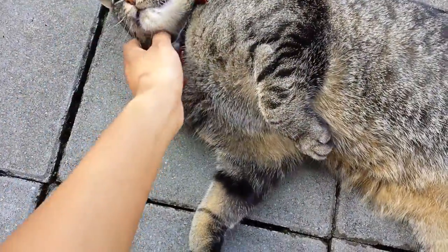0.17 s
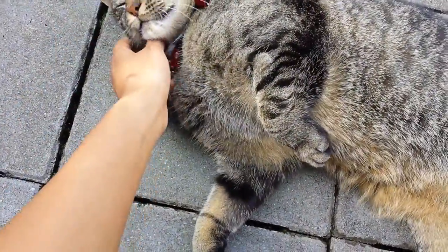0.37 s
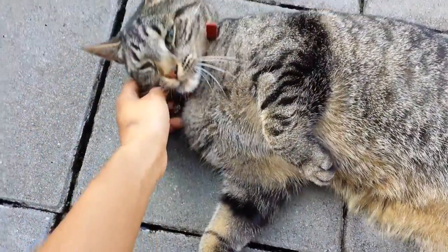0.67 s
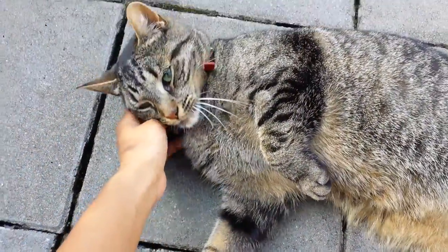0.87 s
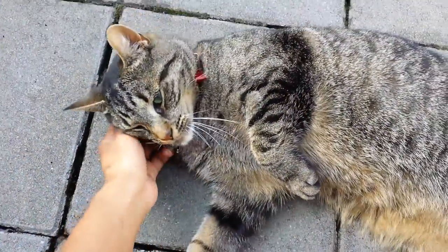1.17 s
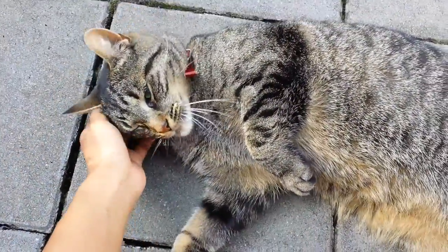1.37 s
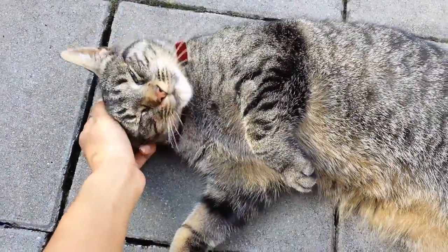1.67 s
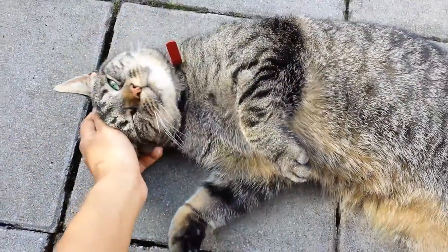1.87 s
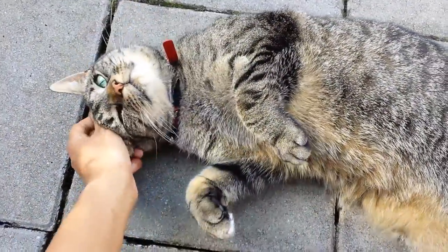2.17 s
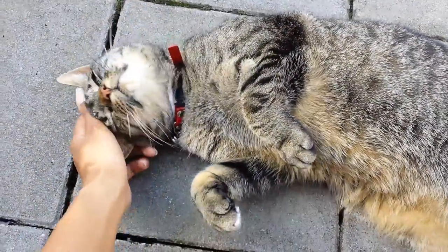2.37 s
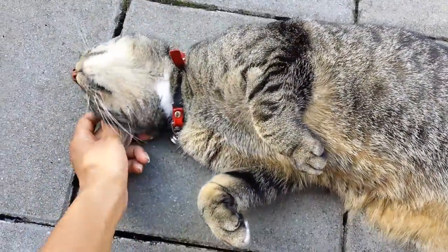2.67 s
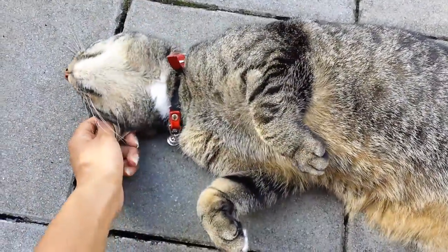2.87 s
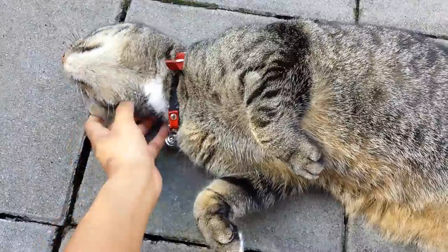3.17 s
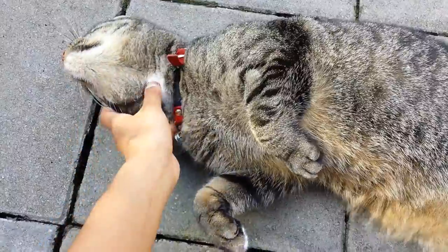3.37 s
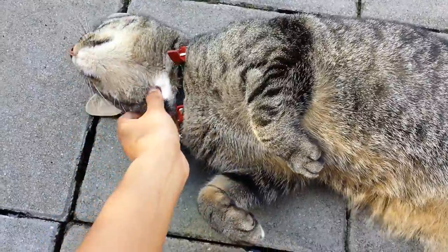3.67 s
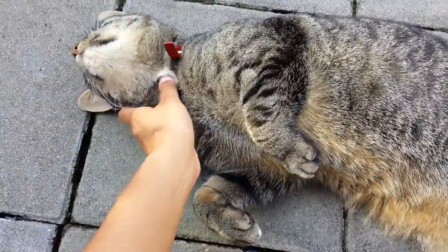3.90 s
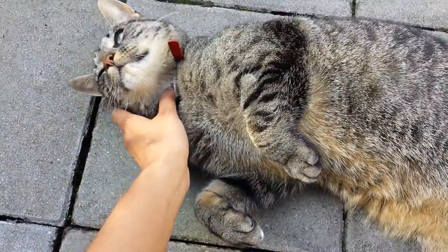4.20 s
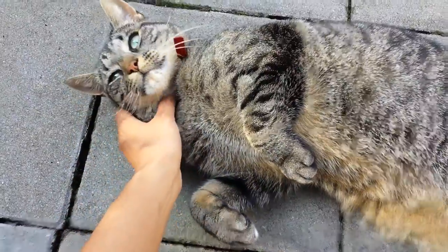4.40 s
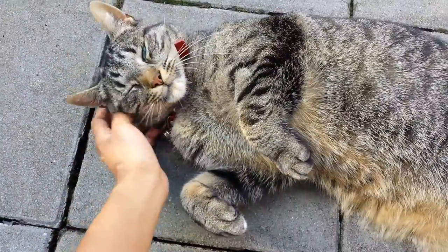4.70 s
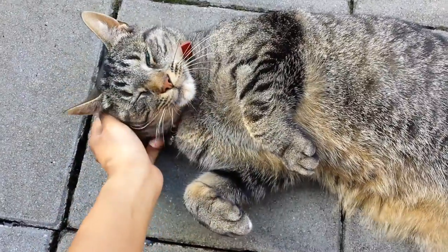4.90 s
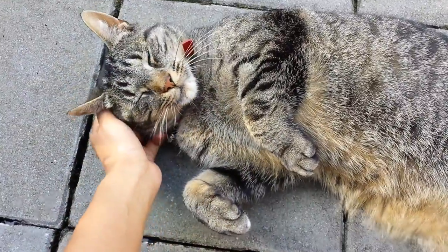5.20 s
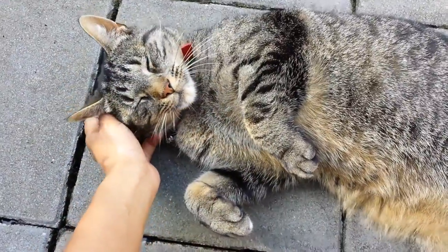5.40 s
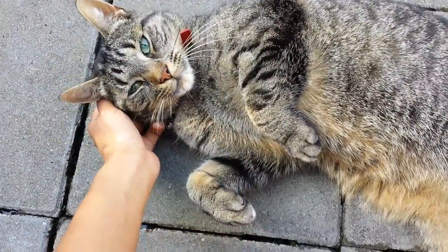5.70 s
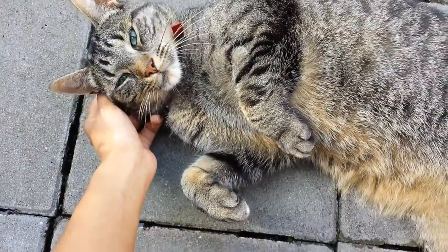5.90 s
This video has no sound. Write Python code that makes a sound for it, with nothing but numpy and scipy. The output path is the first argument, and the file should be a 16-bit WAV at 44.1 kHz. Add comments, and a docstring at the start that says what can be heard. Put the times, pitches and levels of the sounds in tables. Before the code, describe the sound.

Close to the microphone, a hand scratches a cat in a paved yard, making a faint hiss in the fur. The small metal bell on its collar gives thin, half-muffled clinks and tiny rattles, with one much louder jingle a little after a second in. It goes nearly quiet, then returns with scattered soft clinks. A distant engine hums over low outdoor rumble throughout, swelling toward the end.

```python
"""A distant engine hums over low outdoor rumble while, close by, a hand scratches a cat's chin on a paved
yard. The fingers hiss softly in the coat and now and then tap collar or paving.
The small metal bell on the collar clinks, half muffled by fur: its pellet rolls round the shell or
strikes it, and the whole bell knocks against its loop. Each contact rings three families of shell modes."""
import sys
import numpy as np
from scipy import signal
from scipy.fft import rfft, irfft, next_fast_len
from scipy.io import wavfile
from scipy.ndimage import uniform_filter1d, map_coordinates

SR = 44100
rng = np.random.default_rng(int(sys.argv[2]) if len(sys.argv) > 2 else 0)


def generate_wav(sig):
    """Save sig (samples, or channels by samples) to the path in sys.argv[1] as 16-bit PCM at SR."""
    pcm = np.round(np.clip(np.atleast_2d(sig).T, -1, 1) * 32767).astype(np.int16)
    wavfile.write(sys.argv[1], SR, pcm)


N = 266805

# shell modes: (frequency [Hz], level [dB], t60 [s], left over right [dB], gain at full turn [dB])
LOW_MODES = [(1480, -21, 0.027, -9, 2), (2135, -15.5, 0.033, -15, -6), (2862, -9, 0.011, -15, -16),
             (3680, -13.5, 0.046, -20.5, 15), (3895, 2, 0.036, -22, -8), (4432, -8, 0.031, -17, 4),
             (3670, -0.5, 0.007, -15.5, -17.5)]
MIDDLE_MODES = [(6010, 2, 0.0086, -19, -3), (6230, -2.5, 0.014, -15, 7), (6630, -3, .007, -8.5, -6),
                (6780, 0, 0.004, -9.5, -18)]
TOP_MODES = [(9180, 0, .0125, 4, 0), (9750, -17, .008, 3, 0), (8800, -6, .0055, 3, 0),
             (8000, -7, .005, 4, 0), (11400, -22, .009, 5, 6)]
# the bell turns over as the cat rolls its head: (time [s], share of full turn [0-1])
BELL_TURN = [(1.5, 0.01), (3.2, 0.57)]


def amp(db):
    """Decibels to gain."""
    return 10 ** (np.asarray(db) / 20)


def unit(x):
    """x at rms 1."""
    return x / np.sqrt(np.mean(x ** 2) + 1e-20)


def decay(t, t60_s):
    """Exponential fade, 60 dB down at t60_s."""
    return np.exp(-np.log(1000) * t / t60_s)


def along(points, hz):
    """(Hz, value) points read on a log axis."""
    point_hz, values = np.transpose(points)
    return np.interp(np.log(hz + 1), np.log(point_hz + 1), values)


def curves(rows):
    """One value per sample for each column after the time."""
    times_s, *columns = np.transpose(rows)
    return [np.interp(np.arange(N) / SR, times_s, column) for column in columns]


def wobble(rate_hz):
    """Smooth random curve, rate_hz knots a second."""
    knots = rng.standard_normal(int(N * rate_hz / SR) + 4)
    return map_coordinates(knots, [np.arange(N) * rate_hz / SR])


def filtered(x, response):
    """x through a gain given as a function of Hz."""
    size = next_fast_len(N + SR // 2)
    return irfft(rfft(x, size) * response(np.fft.rfftfreq(size, 1 / SR)), size)[..., :N]


def minimum_phase(points, size=1024):
    """Causal impulse response with the given (Hz, dB) colour."""
    cepstrum = irfft(np.log(amp(along(points, np.fft.rfftfreq(size, 1 / SR)))))
    cepstrum[1:size // 2] *= 2
    cepstrum[size // 2 + 1:] = 0
    return irfft(np.exp(rfft(cepstrum)))


def panned(lean_db):
    """Stereo gains of mean power 1; positive leans left."""
    return unit(amp([[lean_db / 2], [-lean_db / 2]]))


def add(track, s, sound):
    """Mix a sound into a stereo track at time s."""
    start = max(round(s * SR), 0)
    part = track[:, start:start + sound.shape[1]]
    part += sound[:, :part.shape[1]]


def engine(level_db=-50, waver_db=1.96, jitter_rad=0.3):
    """Low orders of a distant engine, surging and wavering on their way through the air."""
    # (time [s], firing rate [Hz])
    firing = [(0, 81.35), (.35, 81.5), (1.5, 94.1), (2.05, 92.13), (2.65, 98.94), (4.2, 93.63),
              (6.05, 87.58)]
    # (multiple of firing rate, relative level [dB])
    orders = [(.5, -12), (1, 0.5), (2, -22.5)]
    # (time [s], half length [s], rise [dB])
    surges = [(0.24, 0.15, 5), (1.151, 0.057, 6.5), (1.643, 0.22, 6), (2.338, 0.048, 6), (3.72, 0.56, 5),
              (4.178, 0.2, 9.5), (4.837, 0.24, 12.5), (5.268, 0.098, 8), (5.926, 0.17, 7.5)]
    firing_hz, = curves(firing)
    t = np.arange(N) / SR
    surge_db = sum(db * np.exp(-((t - s) / half_s) ** 2) for s, half_s, db in surges)
    phase = 2 * np.pi * np.cumsum(firing_hz) / SR
    hum = sum(amp(db + waver_db * wobble(10)) * np.sin(order * phase + jitter_rad * wobble(10))
              for order, db in orders)
    return amp(level_db + surge_db) * unit(hum)


def drone(upper_hz=244, lower_hz=188):
    """Two far hums of steady pitch fade and briefly return; the lower is faint and blurred."""
    # (time [s], upper level [dB], lower level [dB])
    fades = [(0, -53.5, -55), (.13, -47.5, -59.5), (.7, -49, -62), (1.9, -64, -63), (2.9, -55, -58),
             (3.6, -66, -67), (6.05, -66.5, -66)]
    upper_db, lower_db = curves(fades)
    t = np.arange(N) / SR
    upper_gain = amp(upper_db - 1 + wobble(6))
    upper = unit(np.sin(2 * np.pi * upper_hz * t + 0.17 * wobble(18)))
    lower_gain = amp(lower_db + 2 * wobble(4))
    lower = unit(np.sin(2 * np.pi * lower_hz * t + 1.3 * wobble(8)))
    return upper_gain * upper + lower_gain * lower


def rumble(level_db=-48, swell_db=0.79):
    """Outdoor rumble, alike on both sides in the bass, nearly unrelated in the treble."""
    # (frequency [Hz], relative density [dB])
    spectrum = [(15, -12), (28, -0.5), (45, 2), (70, -1.5), (130, -6), (200, -10), (300, -14.5), (450, -19),
                (700, -26.5), (1600, -34), (4000, -42.5), (8000, -38.5), (15000, -44.5)]
    # (frequency [Hz], left-right correlation [0-1])
    correlation = [(60, 0.97), (130, 0.89), (290, 0.91), (640, .5), (1400, 0.093)]

    def mid_side_gains(hz):
        angle = np.arccos(along(correlation, hz)) / 2
        return amp(along(spectrum, hz)) * [np.cos(angle), np.sin(angle)]

    mid, side = filtered(rng.standard_normal((2, N)), mid_side_gains)
    return amp(level_db + swell_db * wobble(1)) * unit(np.array([mid + side, mid - side]))


def far_sounds(lag_s=.00015, lean_db=-.5):
    """Hums and rumble arrive from the right: later and weaker on the left."""
    delay_s = np.array([[lag_s / 2], [-lag_s / 2]])
    sound = engine() + drone() + rumble()
    return panned(lean_db) * filtered(sound, lambda hz: np.exp(-2j * np.pi * hz * delay_s))


def fur(level_db=-65.5, lean_db=-12, waver_db=1.23, grain_db=1.5):
    """Hairs slip under the fingertips: a fine, unbroken, grainy hiss."""
    # (frequency [Hz], relative density [dB])
    spectrum = [(500, -22.5), (1500, -11), (2800, -1), (3500, -2.5), (4400, 2.5), (5000, -1.5),
                (6000, -1.5), (8000, -24.5), (15000, -30)]
    hairs = rng.standard_normal((2, N)) * amp(grain_db * wobble(600))
    hiss = unit(filtered(hairs, lambda hz: amp(along(spectrum, hz))))
    return panned(lean_db) * amp(level_db + waver_db * wobble(14)) * hiss


def shell_ring(modes, t60_scale, turn, shift=1, detune=0.0031, attack_s=.0004):
    """One mode family struck once; its loudest moment has rms 1."""
    t = np.arange(SR // 10) / SR
    out = np.zeros((2, len(t)))
    for hz, db, t60_s, lean_db, turned_db in modes:
        # the point of contact changes pitch and strength
        pitch_hz = hz * shift * (1 + detune * rng.standard_normal())
        gain = amp(db + turn * turned_db + rng.standard_normal())
        stereo_rad = .35 * rng.standard_normal() * np.array([[1], [-1]])
        tone = np.sin(2 * np.pi * pitch_hz * t + stereo_rad)
        out += panned(lean_db) * gain * decay(t, t60_s * t60_scale) * tone
    out *= (1 - np.exp(-t / attack_s)) ** 2
    power = uniform_filter1d(np.mean(out ** 2, axis=0), size=60)
    return out / np.sqrt(power.max())


def tick(centre_hz, t60_s, octaves):
    """Dry contact: a short burst of band noise."""
    t = np.arange(SR // 16) / SR
    hz = np.fft.rfftfreq(len(t), 1 / SR)
    band = np.exp(-.5 * (np.log2((hz + 1) / centre_hz) / octaves) ** 2)
    noise = irfft(rfft(rng.standard_normal(len(t))) * band, len(t))
    return unit(noise) * decay(t, t60_s)


def yard(sound, tail_db=-17, early_db=-16.5, early_t60_s=0.11):
    """Adds quick scatter off paving and arm, and the yard's faint tail."""
    # (frequency [Hz], t60 [s])
    reverb_times = [(500, 0.26), (4000, 0.26), (10000, 0.12)]
    hz, frame_s, spectra = signal.stft(rng.standard_normal((2, SR // 3)), SR, nperseg=256)
    spectra *= decay(frame_s, along(reverb_times, hz)[:, None])
    tail = signal.istft(spectra, SR, nperseg=256)[1]
    early = rng.standard_normal(tail.shape) * decay(np.arange(tail.shape[1]) / SR, early_t60_s)
    echo = amp(tail_db) * tail / np.linalg.norm(tail[0])
    echo += amp(early_db) * early / np.linalg.norm(early[0])
    echo = np.diff(echo, axis=1, prepend=0)  # small things nearby reflect mostly treble
    echo[:, 0] = 1  # direct sound
    return signal.fftconvolve(sound, echo, axes=1)


def rolling(tap_rate_hz=900, uneven_db=4.5):
    """The rolling pellet gives the shell tiny uneven taps; faster is louder and brighter."""
    # (start [s], fastest [s], end [s], level [dB], top ring [dB], low ring [dB], grit [dB])
    rolls = [(0.02, 0.062, 0.082, -60, -5.5, 6.5, 0), (0.091, 0.119, 0.15, -58, -3, 1, -8),
             (.305, 0.34, 0.38, -56, -7, 4.5, -10), (0.369, 0.37, 0.45, -53, 2, -4, 2.5),
             (0.397, 0.423, 0.495, -56.5, -7, 6, -9), (1.298, 1.3, 1.306, -46, 0, -12, 7),
             (1.304, 1.306, 1.355, -53, 0, -14, -1), (1.357, 1.378, 1.46, -56.5, -5, -12, -8)]
    # per family, low to top: (gain at full speed [dB], speed exponent)
    speed_response = [(0, 0.79), (2.5, .8), (1, 1.3)]
    # metal sliding on metal: (frequency [Hz], relative density [dB])
    grit_spectrum = [(2000, -16), (5000, -10), (6900, 0), (8600, 0), (10300, -11), (11400, -3),
                     (13000, -15), (15000, -17)]
    out = np.zeros((2, N))
    grit_t = np.arange(SR // 100) / SR
    for start_s, fastest_s, end_s, db, top_db, low_db, grit_db in rolls:
        n = round((end_s - start_s) * SR)
        speed = np.interp(start_s + np.arange(n) / SR, [start_s, fastest_s, end_s], [0, 1, 0])
        taps = unit((rng.random(n) < tap_rate_hz / SR) * amp(uneven_db * rng.standard_normal(n)))
        # each tap lands on one of four spots, each tuned slightly differently
        spots = taps * np.eye(4)[rng.integers(4, size=n)].T
        turn = np.interp(start_s, *np.transpose(BELL_TURN))
        families = [(LOW_MODES, low_db), (MIDDLE_MODES, 0), (TOP_MODES, top_db)]
        sound = 0
        for (modes, family_db), (response_db, exponent) in zip(families, speed_response):
            for spot in spots:
                ring = unit(shell_ring(modes, t60_scale=1.3, turn=turn, detune=.013))
                push = amp(family_db + response_db) * spot * speed ** exponent
                sound += signal.fftconvolve(push[None], ring / np.sqrt(ring.shape[1]), axes=1)
        burst = rng.standard_normal(len(grit_t)) * decay(grit_t, t60_s=.006)
        grit = signal.fftconvolve(minimum_phase(grit_spectrum), burst)
        chatter = tick(centre_hz=2600, t60_s=0.0034, octaves=0.9)  # shell against loop
        for click, lean_db, click_db in [(grit, -1, grit_db - 1), (chatter, -13, low_db - 9)]:
            clicks = signal.fftconvolve(taps * speed, click / np.linalg.norm(click))
            add(sound, 0, panned(lean_db) * amp(click_db) * clicks)
        add(out, start_s, amp(db) * yard(sound))
    return out


def strike(s, db, top_db, low_db, t60_scale, low_t60_scale, top_hz, settle_s=0.029):
    """One contact rings all three families; pressure on the shell detunes the upper two."""
    turn = np.interp(s, *np.transpose(BELL_TURN))
    shift = top_hz / TOP_MODES[0][0]
    low = amp(low_db) * shell_ring(LOW_MODES, low_t60_scale, turn)
    middle = shell_ring(MIDDLE_MODES, t60_scale ** 2.2, turn, shift)  # most sensitive to fur damping
    top = amp(top_db) * shell_ring(TOP_MODES, t60_scale, turn, shift)
    sound = low + middle + top
    contact = tick(centre_hz=7800, t60_s=0.01, octaves=.38)
    add(sound, 0, panned(2) * amp(top_db - 13.5) * contact)
    loop_clack = tick(centre_hz=3400, t60_s=0.014, octaves=0.27)
    add(sound, 0, panned(-18) * amp(low_db - 10.5) * loop_clack)
    t = np.arange(sound.shape[1]) / SR
    muffle = 1 / (1 + (t / settle_s) ** 10)  # the bell sinks back into the fur
    return amp(db) * yard(sound * muffle)


def clinks():
    """Glancing pellet strikes: thin and high, cut short where fur touches the shell."""
    # (time [s], strength [dB], top over middle [dB], low over middle [dB], t60 scale, top pitch [Hz])
    hits = [(0.055, -46.5, 5, -6, 1.5, 9230), (0.2026, -41.5, 2.5, -16, .8, 9330),
            (0.306, -52, -9, -12, 1, 9200), (0.3726, -34.5, -5.5, -8, 1.3, 9200),
            (0.4272, -46, -9, 2, 1, 9400), (0.442, -57, -8, 8, 1, 9050),
            (0.5548, -44.5, 7.5, -14, 1.1, 9240), (0.7389, -37, 3, -21, .9, 9270),
            (1.14, -45.5, 7, -13, 1.1, 9160), (1.1508, -47.5, 11, -15, 1.2, 9250),
            (1.1654, -39, 6.5, -15, .8, 9040), (1.1827, -44.5, -12, -17, 1.1, 9100),
            (1.2156, -49, 0, -9, 1.1, 9000), (1.278, -21, -5, -23, 1.8, 9170),
            (1.2864, -15.3, 4.5, -7, .97, 9030), (1.2995, -28, 3.5, -15, .9, 9070),
            (1.3288, -46, -2, -10, .8, 8900), (1.375, -40, 6.5, -8, 1.1, 9120),
            (1.3878, -47, 4, -7, 1.2, 9234), (1.6042, -52, 4, -10.5, .7, 9140),
            (1.8228, -50.5, 3.5, -17, .8, 9100), (1.8691, -47, -9, -15, 1, 9116),
            (3.242, -34, -3.5, -24, 1.7, 9140), (3.2835, -43.5, -5, -11, .6, 9160),
            (3.327, -51.5, 11.5, -9, .8, 9200), (3.405, -52.5, 9, -4, .8, 9550),
            (3.707, -46.5, 1.5, -18, 1.5, 9130), (3.8112, -48.5, 10, -7, 1.4, 9240),
            (4.165, -46.5, -7, -18.5, .9, 9440), (4.3178, -49, 2.5, -16, .9, 9236),
            (4.346, -48.5, 5.5, -14, .8, 9350), (4.633, -52, 2.5, -4, 1.2, 9220),
            (4.876, -53.5, 8.5, -19, 1.4, 9200), (5.1071, -46.5, 8.5, -15, .9, 9170),
            (5.235, -43.5, 10.5, -21, .85, 9130), (5.3585, -39.5, 11.5, -12, .85, 9170),
            (5.7522, -46.5, 5.5, -14, .7, 9150), (5.981, -57.5, 13, -16, 1.1, 9310)]
    out = np.zeros((2, N))
    for s, db, top_db, low_db, t60_scale, top_hz in hits:
        add(out, s, strike(s, db, top_db, low_db, t60_scale, low_t60_scale=0.53, top_hz=top_hz))
    return out


def knocks():
    """The whole bell swings against its loop, wakes the low ring and rebounds once, weaker."""
    # (time [s], strength [dB], top over middle [dB], rebound gain [dB], rebound delay [s])
    swings = [(0.3333, -48, -17, -3, .0137), (0.691, -34.5, -21, -11, .0128), (2.218, -46, 6, -9, .0084),
              (3.3645, -44.5, 8.5, -15, 0.0095), (3.5475, -38.5, -10, -2, .008),
              (4.0885, -46, -3.5, -13, .0084), (4.589, -39.5, -6, -10, .0084)]
    out = np.zeros((2, N))
    for s, db, top_db, rebound_db, flight_s in swings:
        for hit_s, hit_db in [(s, db), (s + flight_s, db + rebound_db)]:
            hit = strike(hit_s, hit_db, top_db, low_db=-0.5, t60_scale=0.99, low_t60_scale=1, top_hz=9230)
            add(out, hit_s, hit)
    return out


def bell():
    """Clinks, knocks and rolls, coloured by the microphone's treble peaks and dips."""
    # (frequency [Hz], gain [dB])
    mic_colour = [(900, -2), (2400, -1), (4400, -1.5), (5000, 0), (5800, -4.5), (8700, 0.5), (9400, -5),
                  (10300, -1), (11400, -6), (15000, -1)]
    sound = clinks() + knocks() + rolling()
    return signal.fftconvolve(sound, minimum_phase(mic_colour)[None], axes=1)[:, :N]


def strokes(lean_db=-8, grain_db=2):
    """A finger drawn along the coat: scratchy band hiss that swells and fades."""
    # (time [s], half length [s], level [dB], centre [Hz], half width [Hz])
    passes = [(0.956, 0.12, -64, 5400, 1550), (3.561, 0.054, -63, 7860, 494),
              (4.4, 0.28, -68.5, 4500, 1492), (5.427, 0.47, -64, 4400, 1701)]
    t = np.arange(N) / SR
    out = np.zeros((2, N))
    for s, half_s, db, centre_hz, half_hz in passes:
        noise = rng.standard_normal((2, N))
        hiss = unit(filtered(noise, lambda hz: 1 / (1 + ((hz - centre_hz) / half_hz) ** 2)))
        out += amp(db) * np.exp(-((t - s) / half_s) ** 2) * hiss
    return panned(lean_db) * amp(grain_db * wobble(150)) * out


def fingertips(lean_db=-4):
    """Soft dull finger taps on collar and paving."""
    # (time [s], level [dB], centre [Hz])
    taps = [(2.42, -56.5, 1482), (3.05, -56.5, 3783), (5.704, -46.5, 412), (5.76, -58.5, 900)]
    out = np.zeros((2, N))
    for s, db, centre_hz in taps:
        add(out, s, panned(lean_db) * amp(db) * tick(centre_hz, t60_s=0.029, octaves=0.82))
    return out


def scene():
    """Bell, hand and fur close by; hums and rumble far off."""
    return bell() + fingertips() + strokes() + fur() + far_sounds()


def record(dry, cutoff_hz=15650):
    """Brick-wall low-pass."""
    return filtered(dry, lambda hz: hz < cutoff_hz)


dry = scene()
out = record(dry)
generate_wav(out)
```